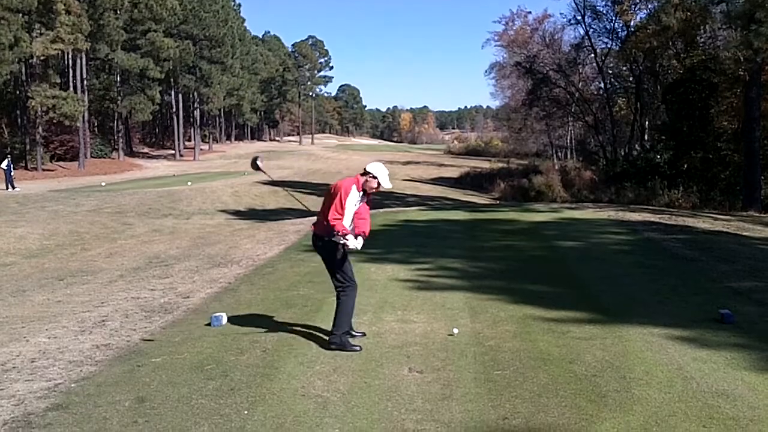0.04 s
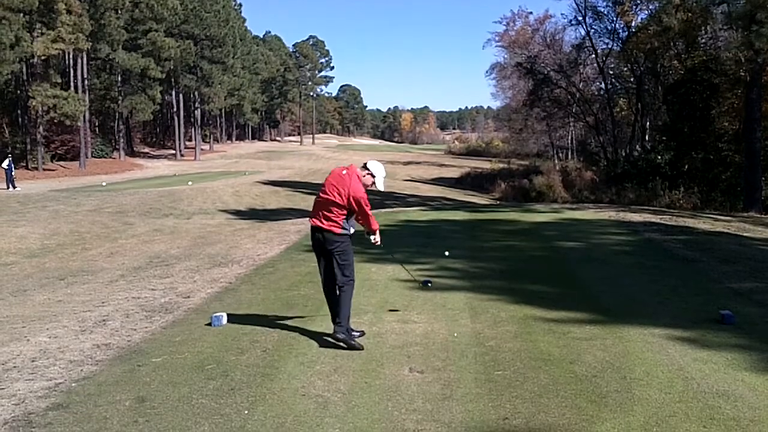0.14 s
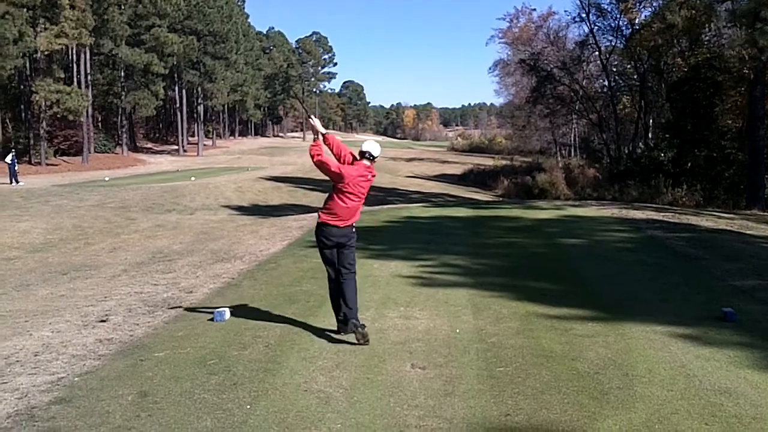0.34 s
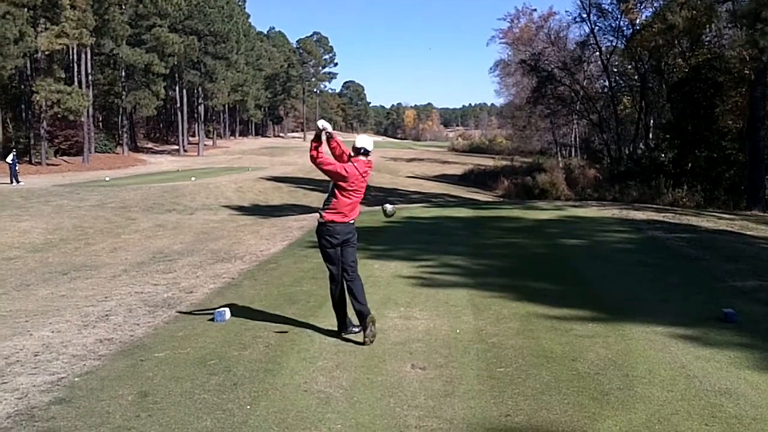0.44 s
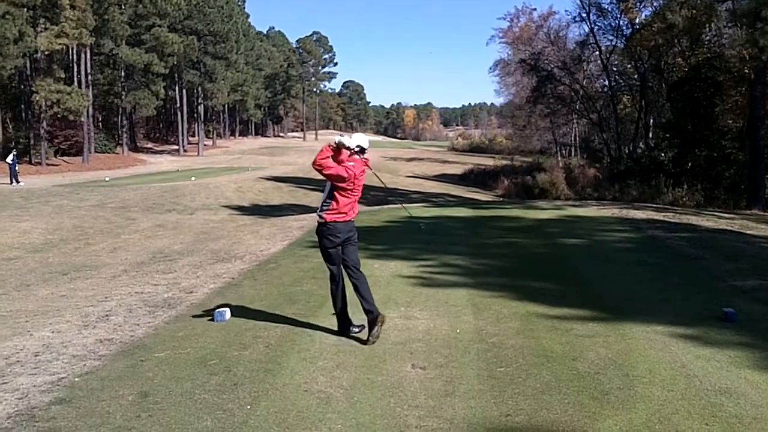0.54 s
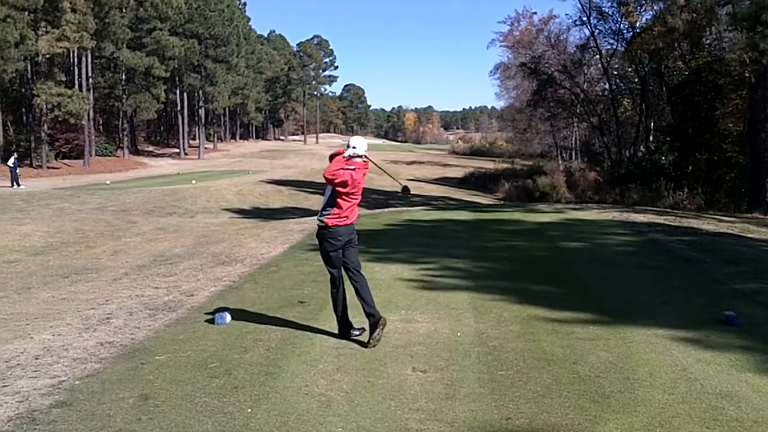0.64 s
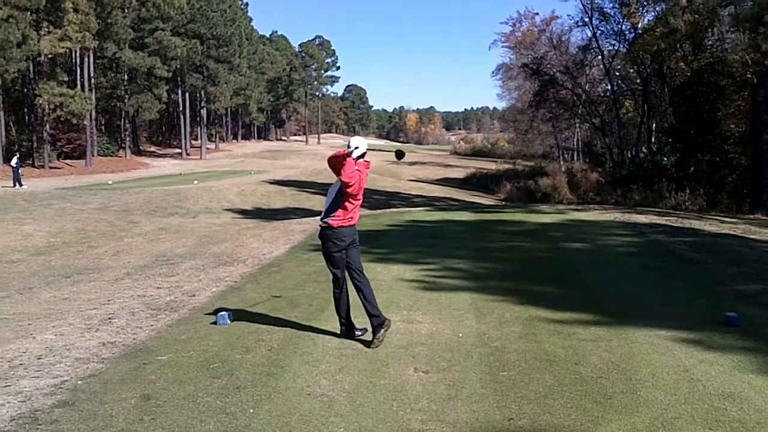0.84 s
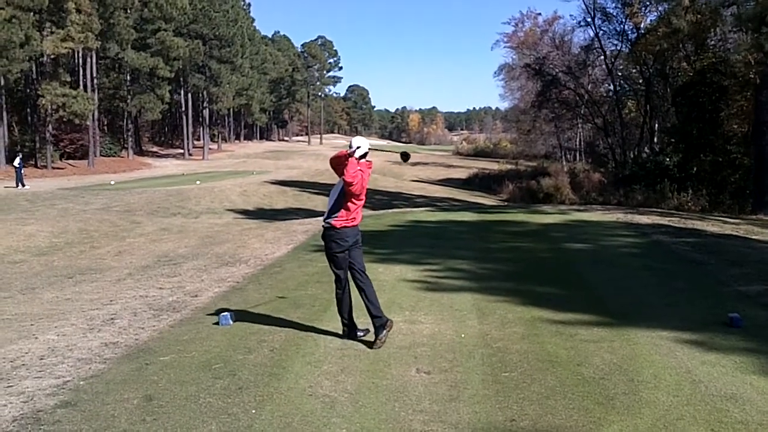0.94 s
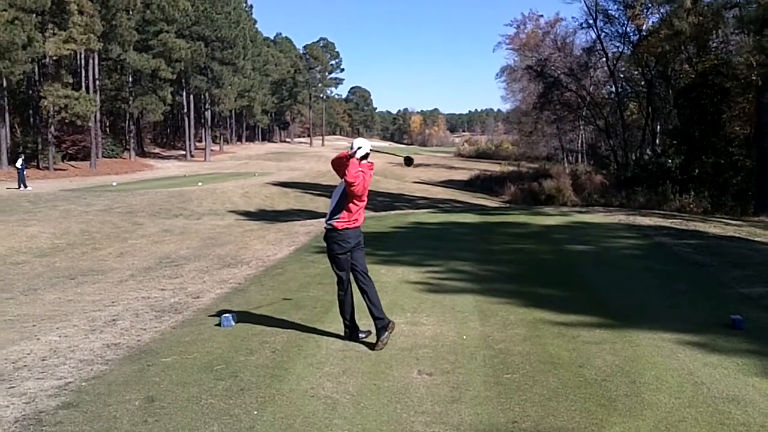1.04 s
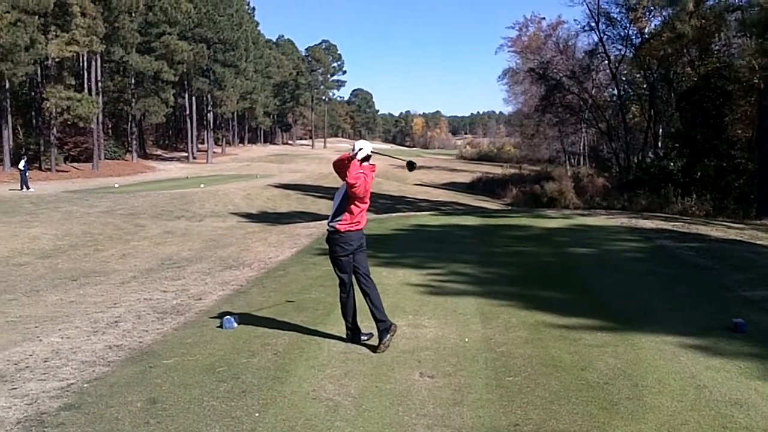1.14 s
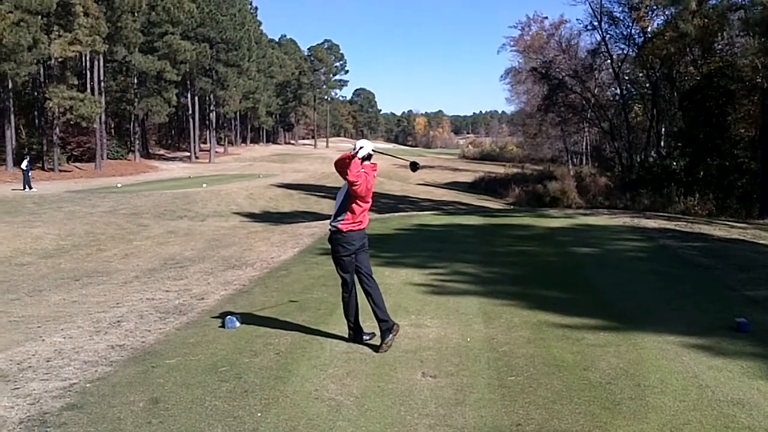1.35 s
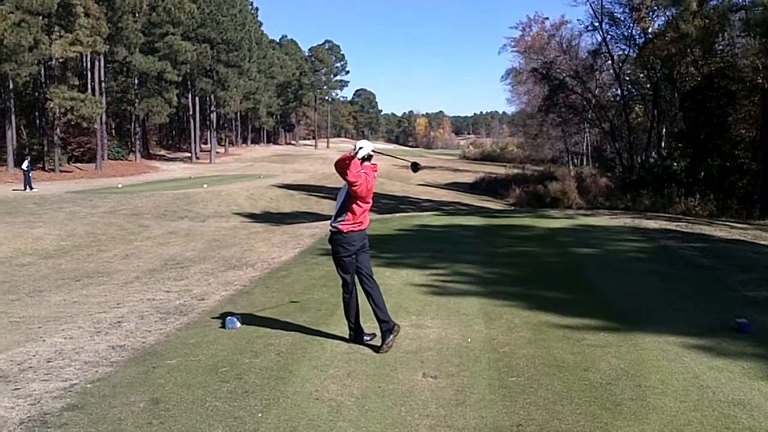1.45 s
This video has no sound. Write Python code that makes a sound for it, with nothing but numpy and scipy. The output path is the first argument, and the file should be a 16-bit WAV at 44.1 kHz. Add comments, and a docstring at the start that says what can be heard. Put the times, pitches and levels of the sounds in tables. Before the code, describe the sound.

A golf driver hits a ball with a quick swish and a sharp crack. The metal head rings briefly and nearby trees return an echo, while light wind rumbles on the microphone over a soft outdoor hiss.

```python
"""On a golf tee near a line of trees, a driver swishes down and cracks the ball away. The hollow
metal head rings briefly, its pitch bent by the swing, and the trees throw the crack back as an echo.
Light wind buffets the microphone over a soft hiss and a far, low drone. The camera adds a faint
ticking buzz, and a distant bird whistles once."""
import sys
import numpy as np
from scipy import signal
from scipy.fft import rfft, irfft, next_fast_len
from scipy.io import wavfile
from scipy.ndimage import map_coordinates

SR = 44100
rng = np.random.default_rng(int(sys.argv[2]) if len(sys.argv) > 2 else 0)


def generate_wav(signal):
    """Clip the signal to [-1, 1] and save it as 16-bit WAV at the path in sys.argv[1]."""
    frames = np.transpose(np.atleast_2d(signal))
    scaled = np.clip(frames, -1, 1) * 32767
    pcm = np.round(scaled).astype(np.int16)
    wavfile.write(sys.argv[1], SR, pcm)


N = 66150
T = np.arange(N) / SR
FFT_SIZE = 2 * next_fast_len(N * 2 // 3)
FREQ = np.fft.rfftfreq(FFT_SIZE, 1 / SR)
HIT_S = .24495  # when the club meets the ball


def amp(db):
    """Turn decibels into a plain multiplier."""
    return 10 ** (np.asarray(db) / 20)


def spectrum(points):
    """Join (f/Hz, level/dB) points into one level for every frequency."""
    hz, db = np.transpose(points)
    return np.interp(np.log(FREQ + 1), np.log(hz + 1), db)


def curve(rows, column=1):
    """One value per sample from a table whose first column is time."""
    rows = np.asarray(rows)
    return np.interp(T, rows[:, 0], rows[:, column])


def filtered(x, gain_db):
    """Turn each frequency up or down, so that nothing sounds before its cause (minimum phase)."""
    cepstrum = irfft(np.maximum(gain_db, -120) * np.log(10) / 20, FFT_SIZE)
    cepstrum[1:FFT_SIZE // 2] *= 2
    cepstrum[FFT_SIZE // 2 + 1:] = 0
    return irfft(rfft(x, FFT_SIZE) * np.exp(rfft(cepstrum)), FFT_SIZE)[:N]


def noise(colour_db):
    """Noise of average strength (rms) 1; its colour is the balance of low and high frequencies."""
    x = irfft(rfft(rng.standard_normal(FFT_SIZE)) * amp(colour_db), FFT_SIZE)[:N]
    return x / np.sqrt(np.mean(x ** 2) + 1e-20)


def at_hit(x):
    """Delay a sound so that it starts at the hit."""
    return np.pad(x, (round(HIT_S * SR), 0))[:N]


def fade(t, t60):
    """Die away by 60 dB every t60 seconds."""
    return np.exp(-np.log(1000) * t / t60)


def wobble(t, rate_hz):
    """A smooth curve through rate_hz random values a second."""
    return map_coordinates(rng.standard_normal(200), [t * rate_hz], mode="mirror")


def wind():
    """Gusts push on the microphone: a rumble with a few single bumps."""
    # strength of the gusts: t/s, level/dB
    gusts = [(0, -49.5), (.18, -41), (.27, -53), (.32, -62), (.37, -41.5), (.5, -44.5), (.62, -44),
             (.73, -48.5), (.81, -47.5), (1.0, -51), (1.14, -56.5), (1.39, -50), (1.5, -54.5)]
    # colour of the rumble: f/Hz, relative level/dB
    colour = [(10, 0), (30, 7.5), (60, -1.5), (110, -18), (200, -33), (400, -52), (2000, -120)]
    # low bumps of air: t/s, level/dB, f/Hz
    bumps = [(0.092, -37.5, 88), (0.177, -35.5, 65), (.44, -60, 42.5), (0.555, -32, 83.3),
             (.56, -41.5, 190), (0.652, -33, 33.3), (0.819, -30.5, 33.8), (1.077, -38, 66)]
    thuds = sum(-amp(db) * np.cos(2 * np.pi * hz * (T - s)) * np.exp(-(2 * hz * (T - s)) ** 2)
                for s, db, hz in bumps)
    return amp(curve(gusts)) * noise(spectrum(colour)) + thuds


def outdoor_air(drone_hz=111, width_hz=14):
    """The steady hiss of open air, with a far drone made of a narrow band of noise."""
    # colour of the air: f/Hz, relative level/dB
    colour = [(40, -6.5), (150, 0.5), (260, -9.5), (500, -8.5), (1000, -19), (2000, -24.5), (3500, -26.5),
              (7000, -32.5), (9300, -30.5), (15000, -30)]
    drone = noise(-20 * np.log10(1 + ((FREQ - drone_hz) / width_hz) ** 2))
    return amp(-58.5) * noise(spectrum(colour)) + amp(-58) * drone


def camera_buzz(rate_hz=59.94, first_s=.00327, tick_s=.0005, pitch_hz=9000):
    """One tiny high tick for each picture the camera takes."""
    from_tick = (T - first_s + .5 / rate_hz) % (1 / rate_hz) - .5 / rate_hz
    gate = np.exp(-(2 * from_tick / tick_s) ** 4)
    return amp(-54.5) * gate * np.sin(2 * np.pi * pitch_hz * from_tick)


def swish():
    """The club tears through the air, loudest just before the hit."""
    # strength of the rushing air: t/s, level/dB
    swell = [(.12, -79), (.158, -61.5), (.174, -52), (.21, -48.5), (.243, -45), (.27, -63), (.32, -69),
             (.4, -76.5)]
    # its colour: f/Hz, relative level/dB
    colour = [(100, -13), (300, -5.5), (600, 0), (1200, -7), (3000, -11.5), (5000, -9.5), (7000, -19),
              (10000, -24.5), (15000, -29)]
    return amp(curve(swell)) * noise(spectrum(colour))


def strike(pitch_ratio, length_s=.15, rise_s=.00012, flutter_hz=118, flutter_db=2, flutter_rad=.34):
    """The blow sets ball and club vibrating. pitch_ratio bends only the ringing tones."""
    # natural tones of ball and head: f/Hz, level/dB, time to fade by 60 dB/s
    tones = [(574, -29.5, .016), (926, -15.5, 0.0044), (2306, -18.5, 0.003), (3282, -22, .014),
             (3713, -39, .1), (4087, -36.5, .11), (4286, -4, 0.0082), (4890, -34.5, 0.1), (5700, -11, .013),
             (6130, -19.5, .1), (6033, -16.5, .135), (6160, -17.5, 0.074), (6500, -15.5, 0.045),
             (7156, -13.5, 0.017), (9550, -26, .04), (10420, -19, .014), (10406, -18, .016),
             (12200, -25.5, .012)]
    # crowded, fast-dying vibrations of face and shaft: f/Hz, relative level/dB
    crack_colour = [(50, -48), (200, -25.5), (700, -10.5), (1500, -9.5), (3000, -6.5), (6000, 7),
                    (10000, -8), (13000, -6.5), (16000, -14)]
    # the quieter, longer shimmer: f/Hz, relative level/dB
    shimmer_colour = [(300, -16), (2500, -17.5), (4200, 2), (6500, 1), (8000, -5.5), (9500, -10.5),
                      (12000, -18), (15000, -21)]
    # the blow's pulse of pressure: f/Hz, relative level/dB
    blow_colour = [(10, -16.5), (40, -4), (150, -2.5), (400, -6), (1000, -0.5), (1900, -1), (3000, -13.5),
                   (6000, -17), (15000, -35)]
    t = T[T < length_s]
    bent_time = np.cumsum(pitch_ratio * np.ones(N))[:len(t)] / SR
    flutter_onset = np.minimum(t * flutter_hz, 1)
    ring = np.zeros(len(t))
    for hz, db, t60 in tones:
        # The turning head beams each tone unevenly, so it flutters.
        level = amp(db + flutter_db * flutter_onset * wobble(t, flutter_hz))
        phase = 2 * np.pi * hz * bent_time + flutter_rad * flutter_onset * wobble(t, flutter_hz)
        ring += level * fade(t, t60) * np.sin(phase)
    crack = amp(-6) * fade(t, t60=.013) * noise(spectrum(crack_colour))[:len(t)]
    shimmer = amp(-31) * fade(t, t60=.14) * noise(spectrum(shimmer_colour))[:len(t)]
    blow = -amp(20) * filtered(1. * (T == 0), spectrum(blow_colour))
    vibration = (ring + crack + shimmer) * (1 - np.exp(-t / rise_s))
    return blow + np.pad(vibration, (0, N - len(t)))


def club_hit():
    """The strike from behind the tee: its pitch dips, then rises, as the head swings away and round."""
    # pitch change caused by the head's motion (Doppler effect): t/s, shift/%
    doppler = [(.247, 0), (.26, -2.8), (.27, -2), (.285, 0), (.32, 4.2)]
    times, percent = np.transpose(doppler)
    pitch_ratio = 1 + np.interp(T + HIT_S, times, percent) / 100
    return at_hit(strike(pitch_ratio))


def tree_echo(loss_db_per_s_khz=9):
    """Each group of trunks scatters the strike back at its own pitch; longer paths lose more treble."""
    # Doppler shift towards each group of trees: pitch ratio
    pitch_ratios = [.98, 1.02, 1.055, 1.08, 1.11, 1.16]
    # strength of the echo after the hit: t/s, relative level/dB
    echo_shape = [(.02, -27.5), (.068, -18.5), (.083, -9.5), (.1, 2.5), (.125, -7.5), (.165, -6.5),
                  (.19, -10.5), (.33, -12), (.42, -16.5), (.7, -17.5), (1.25, -36.5)]
    # its colour: f/Hz, relative level/dB
    colour = [(100, -17.5), (350, -7.5), (700, 1), (1200, -2), (4000, 3.5), (6500, 0), (9000, 0.5),
              (15000, -3)]
    echo = np.zeros(N)
    for pitch_ratio in pitch_ratios:
        reflections = rng.standard_normal(N) * amp(curve(echo_shape))
        hz, t, slices = signal.stft(reflections / np.linalg.norm(reflections), SR, nperseg=256)
        air_loss = amp(-loss_db_per_s_khz * hz[:, None] / 1000 * t)
        dulled = signal.istft(slices * air_loss, SR, nperseg=256)[1][:N]
        echo += signal.fftconvolve(strike(pitch_ratio), dulled)[:N]
    return amp(-14) * at_hit(filtered(echo, spectrum(colour))) / np.sqrt(len(pitch_ratios))


def bird(waver_share=.014):
    """A far bird whistles one faint, wavering note."""
    # course of the whistle: t/s, f/Hz, level/dB
    note = [(1.03, 2126, -91.5), (1.072, 2085, -68), (1.105, 2060, -71.5), (1.15, 2150, -73),
            (1.22, 2192, -80)]
    singing = (T > note[0][0]) & (T < note[-1][0])
    waver = noise(spectrum([(80, 8), (400, -55)]))
    pitch_hz = curve(note) * (1 + waver_share * waver)
    whistle = np.sqrt(2) * np.sin(2 * np.pi * np.cumsum(pitch_hz) / SR)
    return singing * amp(curve(note, column=2)) * whistle


def scene():
    """All the sounds meet at one microphone."""
    golf = club_hit() + swish() + tree_echo()
    return (golf + wind() + outdoor_air() + camera_buzz() + bird())[None]


def record(dry, top_hz=15450):
    """The microphone's case weakens some pitches, the crack overloads it, and the top treble is cut."""
    # dips caused by the case: f/Hz, half-width/Hz, depth/dB
    dips = [(2700, 150, 19), (5500, 120, 20), (7850, 320, 16), (10950, 220, 14)]
    dips_db = -sum(depth / (1 + ((FREQ - hz) / width) ** 2) for hz, width, depth in dips)
    overloaded = np.clip(filtered(dry[0], dips_db), -1, 1)
    treble_cut = 1 / (1 + (FREQ / top_hz) ** 120)
    return irfft(rfft(overloaded, FFT_SIZE) * treble_cut, FFT_SIZE)[None, :N]


dry = scene()
out = record(dry)
generate_wav(out)
```